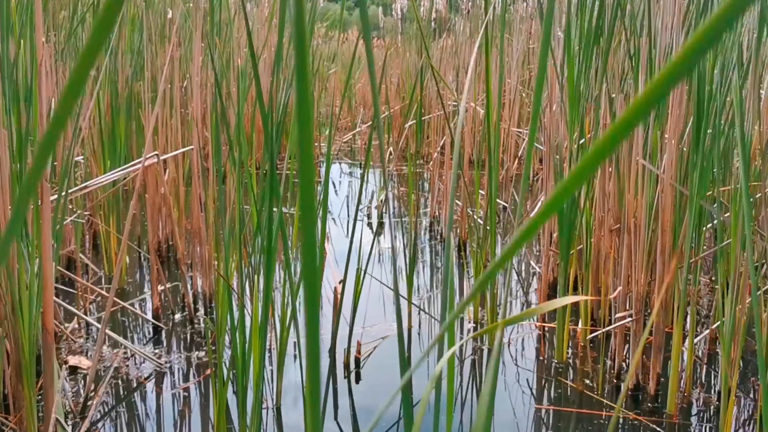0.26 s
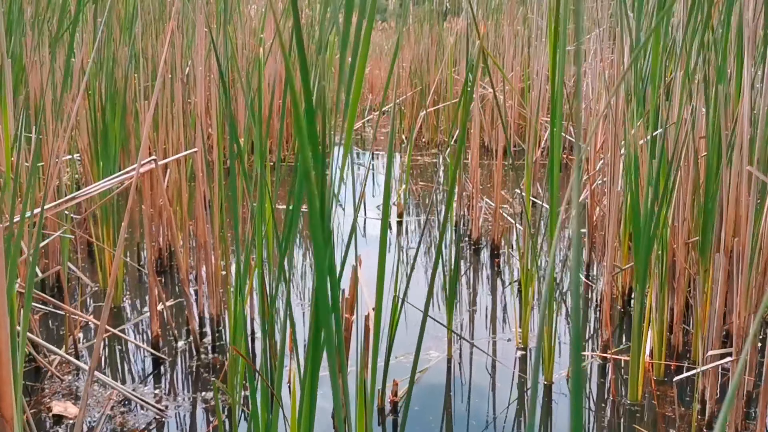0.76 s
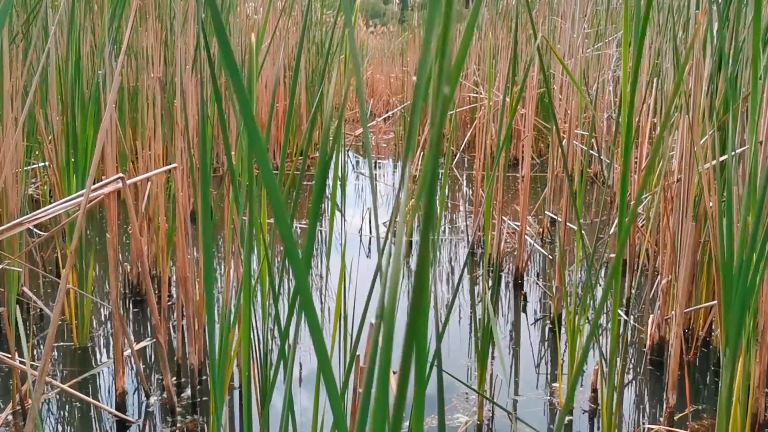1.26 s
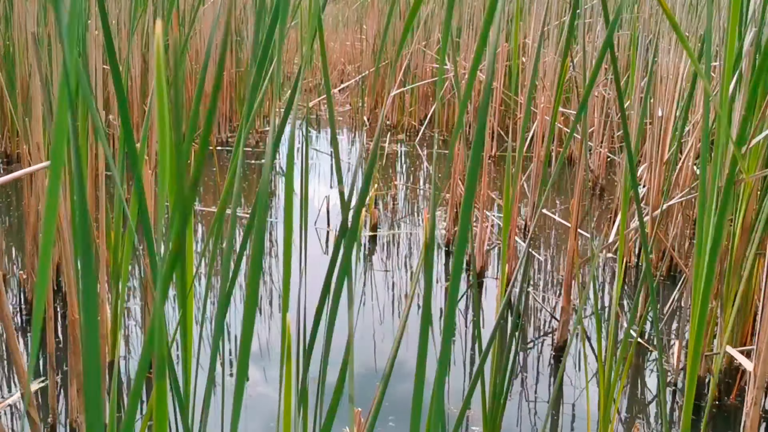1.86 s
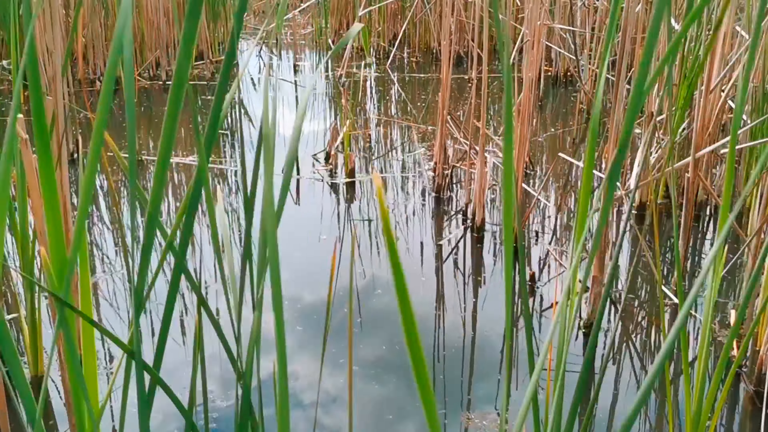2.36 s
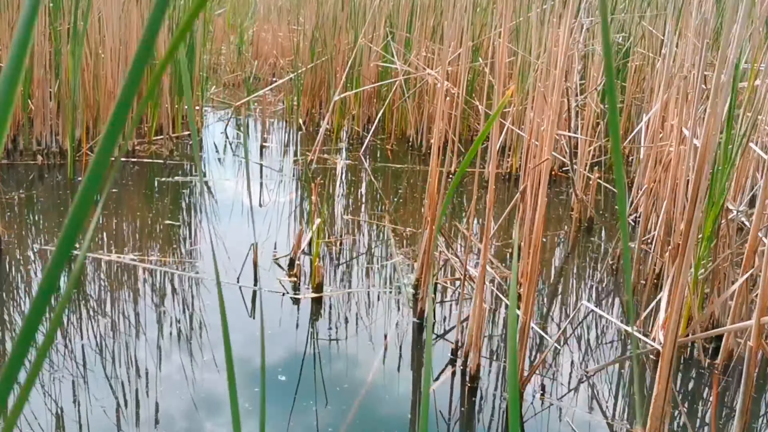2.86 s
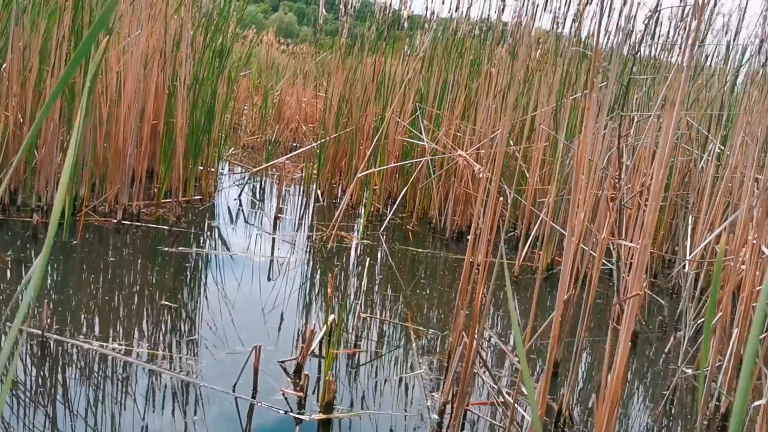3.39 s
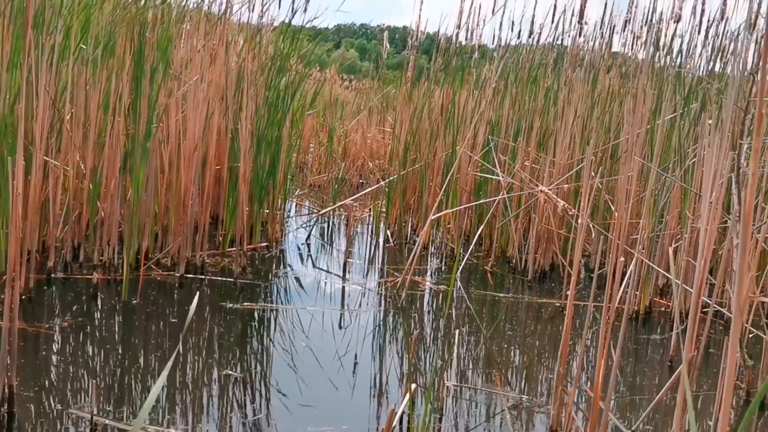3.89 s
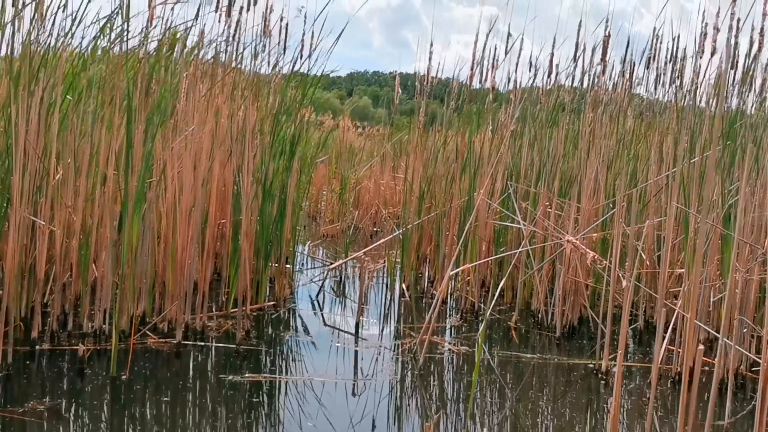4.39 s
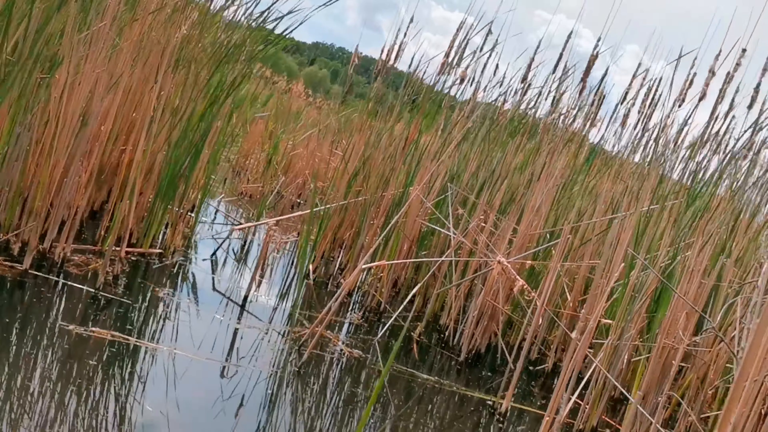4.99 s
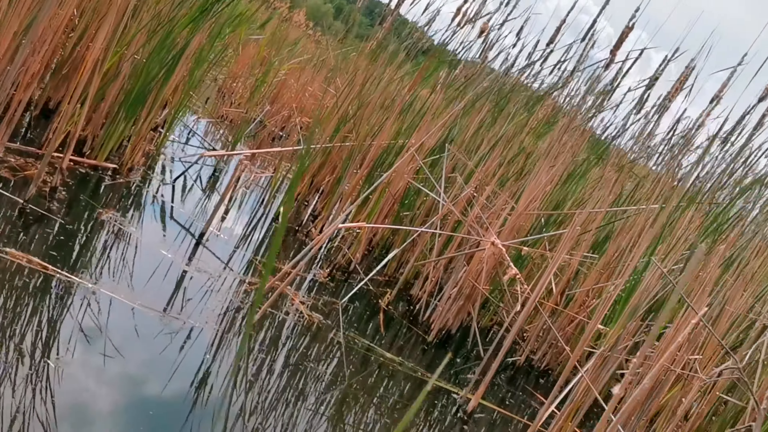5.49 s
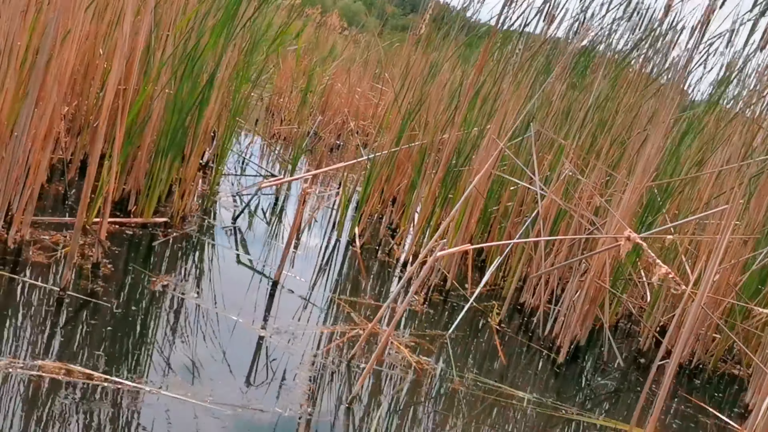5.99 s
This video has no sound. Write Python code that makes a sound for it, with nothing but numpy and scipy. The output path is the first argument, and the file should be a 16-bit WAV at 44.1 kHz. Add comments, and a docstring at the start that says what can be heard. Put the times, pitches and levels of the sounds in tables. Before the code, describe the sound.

Close, crisp rustling and snapping of reed blades, busiest at first, thinning midway, swelling again, then ending in bubbling water.

```python
"""A small camera is pushed through reeds standing in still water. From the start leaves scrape its case, mostly on
the right, as filtered noise in tiny catches, over a far reedy hiss, a bubbly wash, stem thuds and wind rumble.
Soon blades flick in enveloped leaf noise, stems tap as decaying sines, wet blades squeak as gliding breathy tones,
and one stem jerks along the case in low sines. Near the end the water gurgles with ringing, pitch-gliding bubbles.
The left microphone port hears the treble duller; the right one has cavity resonances."""
import sys
import numpy as np
from scipy import signal
from scipy.fft import rfft, irfft, next_fast_len
from scipy.io import wavfile
from scipy.ndimage import uniform_filter1d, map_coordinates

SR = 44100
rng = np.random.default_rng(int(sys.argv[2]) if len(sys.argv) > 2 else 0)


def transcribe(u):
    """Save the signal u as a 16-bit wav file named by the first command-line argument.

    u: samples, shape (n,) or (channels, n), limited to [-1, 1]; the rate is SR.
    q: integer samples, one column per channel.
    """
    v = np.clip(np.atleast_2d(u).T, -1, 1)
    q = np.round(v * 32767).astype(np.int16)
    wavfile.write(sys.argv[1], SR, q)


N = 275625


def amp(db):
    """Linear gain of a level in dB."""
    return 10 ** (np.asarray(db) / 20)


def unit(x):
    """Scale a signal to rms 1."""
    return x / np.sqrt(np.mean(x ** 2) + 1e-20)


def along(points, hz):
    """Read a curve of (Hz, value) points on a log frequency axis."""
    f, v = np.transpose(points)
    return np.interp(np.log(hz + 1), np.log(f + 1), v)


def curves(rows):
    """Draw one value per sample for each column after the time."""
    s, *columns = np.transpose(rows)
    return [np.interp(np.arange(N) / SR, s, column) for column in columns]


def wobble(rate):
    """A smooth random curve with rate knots a second."""
    knots = rng.standard_normal(int(N * rate / SR) + 4)
    return map_coordinates(knots, [np.arange(N) * rate / SR])


def filtered(x, response):
    """Shape the spectrum of x by a response of frequency in Hz."""
    m = next_fast_len(x.shape[-1] + SR // 2)
    return irfft(rfft(x, m) * response(np.fft.rfftfreq(m, 1 / SR)), m)[..., :N]


def noise(spectrum, alike, patchy_db=0):
    """Stereo noise of rms 1 in patches of random gain; alike is the share of power common to both ports."""
    z = signal.stft(rng.standard_normal((3, N)), nperseg=1024)[2]
    field = rng.standard_normal(z.shape[1:])
    field = uniform_filter1d(uniform_filter1d(field, 3, 0), 4, 1)  # smooth across frequency, then time
    white = signal.istft(z * amp(patchy_db * unit(field)), nperseg=1024)[1][:, :N]
    share = np.clip(alike, 0, 1)
    pair = np.sqrt(share) * white[0] + np.sqrt(1 - share) * white[1:]
    return unit(filtered(pair, lambda hz: amp(along(spectrum, hz))))


def sides(pan_db):
    """Left and right gains of constant power for a left-right difference in dB."""
    ratio = amp(pan_db)
    return np.array([ratio, np.ones_like(ratio)]) * np.sqrt(2 / (1 + ratio ** 2))


def swells(rows, rest_db):
    """Gain of rounded swells (middle s, length s, dB), added in power to a resting level."""
    t = np.arange(0, N, 32) / SR
    power = sum(amp(db) ** 2 * np.exp(-2 * np.abs(2 * (t - s) / length) ** 3) for s, length, db in rows)
    return np.sqrt(amp(rest_db) ** 2 + np.interp(np.arange(N) / SR, t, power))


# Colour of the papery leaf part. Each row: frequency in Hz, relative level in dB per Hz.
PAPERY_COLOUR = [(710, -27), (1200, -16), (1520, -16.5), (1620, -9.5), (1790, -14), (2220, -6.5),
                 (2900, -3), (3220, -7.5), (3600, -7), (3960, -5.5), (4360, -2.5), (5320, -0.5),
                 (9500, -3.5), (12400, -8), (20900, -120)]
# Colour of the thin bright leaf part. Each row: frequency in Hz, relative level in dB per Hz.
BRIGHT_COLOUR = [(4410, -25), (7500, -7), (8540, -5), (10900, -1), (13100, -0.5), (14100, -11), (15200, -4),
                 (16000, 0.5)]


def leaf_sound(low_gain, gain, patchy_db, crackle=1):
    """Leaf noise: a broad papery part and a thin bright part, the rest of the power, which crackles most."""
    low = np.clip(low_gain, 0, .97)
    papery = noise(PAPERY_COLOUR, 0, patchy_db) * unit(crackle ** .7)
    bright = noise(BRIGHT_COLOUR, 0, patchy_db) * unit(crackle)
    return gain * (low * papery + np.sqrt(1 - low ** 2) * bright)


# The continuous scrape of leaves. Each row: time in seconds, level in dB, papery part in dB re that level,
# left-right in dB.
SCRAPE_COURSE = [(0, -24.5, -6, -6), (.12, -32, -6, -7.5), (.3, -35, -8, -7.5), (.56, -37, -10, -7),
                 (.82, -37.5, -6.5, -7.5), (.92, -32, -8, -5.5), (1.2, -36, -6.5, -7.5),
                 (1.5, -36, -6.5, -4.5), (1.82, -44.5, -5, -3.5), (2.3, -44, -4.5, -1.5),
                 (2.7, -43, -5, -1.5), (3.4, -44.5, -5.5, -2), (3.67, -47, -4.5, -1),
                 (4.0, -38.5, -11, -2.5), (4.295, -43, -4.5, -2), (4.325, -33, -8, -2),
                 (4.6, -30, -4, -1.5), (4.95, -34, -4.5, -2), (5.23, -41.5, -3.5, -4.5), (5.5, -47, -3, -2),
                 (5.8, -49.5, -3, -2.5), (6.25, -47, -2.5, -2.5)]
# Single blades whisking past. Each row: middle in seconds, length in seconds, level in dB,
# papery part in dB re that level, left-right in dB.
BLADE_SWISHES = [(0.068, 0.042, -25.5, -7.5, -7), (0.181, 0.069, -26.5, -7, -8),
                 (.245, 0.058, -29.5, -4, -9), (0.408, .08, -40, -9, -8), (0.504, 0.077, -35, -7, -12),
                 (0.645, .07, -35, -10, -8), (0.888, 0.048, -37.5, -5.5, -8),
                 (1.143, 0.037, -34.5, -5.5, -5), (1.27, .06, -34, -7, -12), (1.43, 0.05, -32, -5, -7),
                 (1.672, 0.035, -34, -4.5, -3), (1.74, 0.044, -45, -2, -2), (2.187, 0.045, -44, -4.5, -2),
                 (2.43, .05, -39, -6, -3), (2.51, 0.055, -38, -9.5, 1), (2.707, 0.084, -39.5, -5.5, -1),
                 (2.795, 0.045, -35.5, -8, 1), (2.929, 0.063, -39, -6, 0), (3, 0.069, -42, -4, -2),
                 (3.095, 0.031, -46, -7, -2), (3.172, 0.057, -41.5, -7.5, -2), (3.294, 0.1, -38, -9.5, -2),
                 (3.343, 0.027, -33.5, -9.5, -3), (3.56, 0.14, -43.5, -8.5, -2),
                 (3.773, 0.12, -37, -11, -2), (4.11, 0.064, -37.5, -10, -3), (5.0, 0.054, -33, -6, -4),
                 (5.092, 0.082, -31.5, -10, -4), (5.158, .05, -35, -4, -3), (5.31, .085, -33, -6, -7),
                 (5.384, 0.088, -35.5, -7, -3), (5.61, 0.084, -43, -4.5, -3), (5.667, 0.039, -41, -4, -2),
                 (5.977, 0.15, -46.5, -2.5, -5), (6.156, 0.028, -40, -2, -1)]


def leaves():
    """Blades stick and slip over the case: a hiss of many tiny catches, single blades whisking through it."""
    level_db, low_db, pan_db = curves(SCRAPE_COURSE)
    low_rows = [(s, length, db + part_db) for s, length, db, part_db, _ in BLADE_SWISHES]
    left_rows = [(s, length, db + side_db) for s, length, db, _, side_db in BLADE_SWISHES]
    gain = swells([row[:3] for row in BLADE_SWISHES], level_db)
    low = swells(low_rows, level_db + low_db) / gain
    left = swells(left_rows, level_db + pan_db) / gain
    catches_per_s, catch_t60 = 450, 0.002  # t60 in s
    catches = (rng.random(N) < catches_per_s / SR) * amp(4 * rng.exponential(size=N).clip(0, 2.6))
    die = amp(-60 * np.arange(SR // 20) / SR / catch_t60)
    flutter_db = 1.3 * wobble(45)
    grain = 1.3 + signal.fftconvolve(catches, die)[:N]  # catches over a steady hiss
    return leaf_sound(low, gain * amp(flutter_db) * sides(20 * np.log10(left)), 2.4, grain)


# Colour of the far rustle. Each row: frequency in Hz, relative level in dB per Hz.
MARSH_COLOUR = [(120, -34), (200, -20.5), (245, 3.5), (373, -8), (800, -1.5), (1530, -3.5), (2210, 0),
                (3020, -16), (10900, -21), (16000, 9.5)]


def marsh():
    """Reeds farther off: a fine hiss that flickers with countless small ticks."""
    ticks_per_s, tick_t60 = 90, 0.011  # t60 in s
    ticks = (rng.random((2, N)) < ticks_per_s / SR) * amp(4.4 * rng.exponential(size=(2, N)).clip(0, 2.6))
    die = amp(-60 * np.arange(SR // 20) / SR / tick_t60)
    flicker_db = 1.9 * wobble(25)
    grain = unit(5.7 + signal.fftconvolve(ticks, die[None], axes=1)[:, :N])
    return amp(-46.5 + flicker_db) * grain * noise(MARSH_COLOUR, alike=0.092, patchy_db=2.0)


def bubble(hz, t60, glide):
    """An air pocket rings; its pitch glides as it rises or is squeezed."""
    t = np.arange(round(t60 * SR)) / SR
    tone = np.sin(2 * np.pi * hz * t * (1 + glide * t / (2 * t60)))
    return tone * amp(-60 * t / t60) * (1 - np.exp(-t / 0.0018))


# Course of the wash. Each row: time in seconds, level in dB.
WASH_COURSE = [(0.0, -46), (0.57, -56), (0.92, -57.5), (1.34, -52.5), (1.88, -57.5), (2.3, -52.5),
               (3.48, -59.5), (3.9, -54.5), (4.7, -61), (5.26, -50), (5.79, -50), (6.0, -44), (6.15, -41),
               (6.25, -43)]
# Colour of the wash noise. Each row: frequency in Hz, relative level in dB per Hz.
WASH_COLOUR = [(150, -41), (250, -9), (479, 2), (660, 4), (917, -7.5), (1160, -0.5), (1620, 0), (2240, 3),
               (4000, -11.5), (5200, -30), (8800, -120)]
# Bubbles that stand out. Each row: start in seconds, level in dB, pitch in Hz, t60 in seconds,
# left-right in dB, pitch glide as a share over the t60.
LARGE_BUBBLES = [(0.059, -29, 328, 0.026, -2, .4), (0.259, -37, 710, 0.059, -4, 0.24),
                 (1.141, -33, 725, 0.028, -3, 0.24), (1.25, -40, 1170, 0.039, -4.0, .4),
                 (1.482, -41.5, 1270, 0.051, -3.0, .4), (1.669, -41.5, 898, 0.06, -3, .4),
                 (2.167, -43.5, 490, 0.094, -2.0, .3), (3.743, -39, 640, 0.049, 7, 0.17),
                 (4.893, -39.5, 1150, 0.047, -5.5, 0.23), (5.672, -39, 1250, 0.058, -10, .4),
                 (5.739, -40, 610, 0.05, -5, .4), (5.871, -32, 1500, 0.03, -7, .1),
                 (5.872, -32, 596, 0.098, -1, 0.067), (5.899, -36.5, 580, 0.085, -2, .2),
                 (5.903, -36, 1130, 0.04, -6, .4), (5.928, -39, 1490, 0.05, -10, .1),
                 (5.944, -38.5, 520, 0.097, 1, -.1), (5.95, -36, 1300, 0.05, -8, 0.3),
                 (5.967, -38.5, 460, 0.15, 1, -0.11), (6, -34, 272, 0.085, 2, .8),
                 (6.008, -35, 2400, 0.044, -8, .2), (6.028, -34.5, 430, 0.069, 0, .4),
                 (6.049, -38, 500, 0.09, 0, 0.39), (6.053, -37, 2330, .05, -8, -.1),
                 (6.073, -33, 2290, 0.033, -9, -.1), (6.074, -27.5, 450, 0.042, 0, .9),
                 (6.097, -37, 597, 0.076, -1, 0.22), (6.104, -35, 2330, 0.03, -6, .1),
                 (6.115, -26, 590, 0.038, -2.5, -0.53), (6.127, -31.5, 1120, 0.05, -3, .4),
                 (6.129, -24, 440, 0.028, 1, -.3), (6.14, -36, 2000, .03, -7, .2),
                 (6.172, -32.5, 704, 0.044, -2, 0.018), (6.172, -27.5, 448, 0.034, 2, .3),
                 (6.194, -33.5, 440, 0.057, 1, -.1), (6.199, -39, 2150, 0.03, -8, .1)]
WATER_LEAD_S, LEAD_FROM_HZ = .00045, 640  # the upper part of the wash reaches the left port first
WATER_PAN_DB = -0.6  # left-right


def water():
    """A soft wash strewn with small bubbles, and the larger ones that stand out."""
    (level_db,) = curves(WASH_COURSE)
    small, large = np.zeros((2, 2, N + SR))
    for when, pitch, size, side in rng.random((1300, 4)):
        hz = 800 * 3.7 ** pitch
        ring = bubble(hz, 20 / hz, glide=0.48) * amp(8.8 * size + 5 * pitch)
        left, right = sides(12 * side - 8)
        start = round(when * N)
        small[0, start + round(30 * side):][:len(ring)] += ring * left  # delays in samples set the ports apart
        small[1, start + 15:][:len(ring)] += ring * right
    for s, db, hz, t60, pan_db, glide in LARGE_BUBBLES:
        ring = amp(db) * bubble(hz, t60, glide)
        large[:, round(s * SR):][:, :len(ring)] += ring * sides(pan_db)[:, None]
    wash = noise(WASH_COLOUR, alike=0.51, patchy_db=3.5) + 0.55 * unit(small[:, :N])
    lag_s = WATER_LEAD_S * np.arange(2)[:, None]  # none on the left
    wash = filtered(wash, lambda hz: np.exp(-2j * np.pi * (hz - LEAD_FROM_HZ).clip(0) * lag_s))
    return amp(level_db) * unit(wash) * sides(WATER_PAN_DB)[:, None] + large[:, :N]


# Stems leaning on the case. Each row: middle in seconds, length in seconds, thud level in dB,
# drag in dB re the thud.
STEM_LEANS = [(.04, .12, -52, -6.5), (0.227, 0.12, -44, -8.5), (0.444, 0.15, -50, -10.5),
              (.84, 0.22, -52.5, -8.5), (1.136, 0.21, -52, -7), (1.447, 0.15, -50.5, -5.5),
              (1.61, 0.15, -48, -6.5), (1.94, 0.16, -53.5, -7), (2.29, 0.55, -53, -6),
              (2.96, 0.15, -59, -6), (3.412, 0.091, -58.5, -7), (4.047, 0.25, -54, 0),
              (4.375, 0.19, -54, -12), (4.917, 0.083, -52.5, -11), (5.27, 0.17, -47.5, -4),
              (5.467, 0.16, -45.5, -10), (5.73, 0.2, -47.5, -5.5), (5.945, 0.26, -48, -10.5),
              (6.12, 0.16, -54, 2)]
# Wind on the ports. Each row: middle in seconds, length in seconds, level in dB.
WIND_GUSTS = [(.02, .1, -42), (.14, 0.18, -47.5), (.38, 0.073, -40), (.56, .2, -48.5), (1.01, 0.12, -45),
              (1.17, .1, -50), (1.58, 0.15, -47), (1.94, .12, -43), (2.31, 0.29, -46), (2.9, .25, -55),
              (3.25, 0.21, -50.5), (3.41, 0.065, -46), (3.55, 0.19, -50.5), (5.49, 0.093, -54),
              (5.72, 0.24, -53), (6.02, .14, -47.5), (6.16, .16, -53)]
# Colours of stem thud, stem drag and wind. Each row: frequency in Hz, relative level in dB per Hz.
THUD_COLOUR = [(55, -40), (80, -3.5), (110, 0), (165, -0.5), (210, -11), (300, -37)]
DRAG_COLOUR = [(150, -39), (200, 1.5), (260, -1), (340, -7), (450, -13), (700, -35)]
WIND_COLOUR = [(10, -36), (20, -2), (40, -0.5), (70, -4.5), (110, -18), (200, -57)]
STEM_REST_DB, DRAG_REST_DB, CALM_DB = -61.5, -64.5, -60  # between stems and between gusts
WIND_PAN_DB = -1.5  # left-right


def bumps():
    """Stems thud and drag through the case nearly alike on both ports; wind buffets each mostly on its own."""
    thud = swells([row[:3] for row in STEM_LEANS], STEM_REST_DB)
    drag = swells([(s, length, db + drag_db) for s, length, db, drag_db in STEM_LEANS], DRAG_REST_DB)
    thuds = thud * amp(0.68 * wobble(25)) * noise(THUD_COLOUR, alike=0.99, patchy_db=2.5)
    drags = drag * noise(DRAG_COLOUR, alike=0.91, patchy_db=2.5)
    wind = swells(WIND_GUSTS, CALM_DB) * noise(WIND_COLOUR, alike=0.13) * sides(WIND_PAN_DB)[:, None]
    return thuds + drags + wind


# Blades springing off the case. Each row: release in seconds, level in dB, papery part in dB re the whole,
# left-right in dB, snap in dB re the level.
BLADE_FLICKS = [(0.0698, -7.5, -15.5, -4, -7), (0.2787, -10.5, -8.5, -5, -4), (0.314, -11.5, -32, -7, -4),
                (0.5166, -11, -14.5, -2, -4), (0.6204, -18.5, -9, -9, -12), (0.6774, -17.5, -12, -7, -2),
                (0.7555, -14.5, -6.5, -9, -6), (0.8644, -13.5, -12, -9, -7), (0.8745, -21, -8, -9, -8),
                (1.1657, -17, -20, -6, -2), (1.263, -20, -8, -19, -8), (1.277, -22, -10, -9, -6),
                (1.2968, -19.5, -3, -5, -0.5), (1.4047, -12.5, -12, -3, -9), (1.6435, -24, -1, -1, -10),
                (1.6811, -13, -10, 0, -1), (1.7814, -31, -6, -5.5, -1), (1.8041, -17.5, -8.5, -3, 0),
                (2.016, -25, -9, -7, -3), (2.1707, -29.5, -6, 1, -10), (2.3982, -23.5, -8, -5, -2),
                (2.5556, -29, 0, 11, 5.5), (2.6928, -26, -4.5, 7, -7), (2.765, -24, -19, 3, -2),
                (3.2281, -26, -16, 4, -2.5), (3.432, -30, -2, -2, -6), (3.579, -26.5, -6, 0, -12),
                (3.732, -26.5, -10, -5, -6), (3.7599, -20.5, -15, -1, -9), (3.898, -15.5, -15, -1, -9),
                (4.103, -22, -9, -3, -3), (4.145, -17.5, -25, 3, -4), (4.1679, -17, -21, 0, -4),
                (4.2178, -27, -14, 6, 0), (4.2558, -20, -27, 1, -2), (4.273, -19.5, -23, 5, -2),
                (4.306, -24, -9, 3, -10), (4.4445, -22.5, -4.5, 3, -12), (4.9674, -14, -10, -1, -8),
                (4.992, -21, -1, -4, -6), (5.073, -25, -11, -6, -6), (5.0968, -22, -20, -3, 2),
                (5.146, -19.5, -4, 3, -15), (5.254, -21.5, 0, -13.5, -4), (5.275, -19.5, -0.5, -2, -3),
                (5.328, -15, -5, -2, -3), (5.347, -22, -6, -4, -6), (5.3962, -29, -1, -8, -8),
                (5.402, -28, 0, -8, -3), (5.4266, -16, -4, -4, -3), (5.5115, -28.5, -5, -4, -7),
                (5.567, -21, -10.5, 2, -5), (5.654, -27, -6, 2, -12), (6.1408, -28, -2, 2, -6)]
SHIVER_S, SHIVER_S_PER_DB = 0.014, .0006  # t60 of a flick with a 0 dB snap; a softer snap shivers longer


def flicks():
    """A bent blade strains, lets go with a snap and shivers on for a moment."""
    size, low, t = np.zeros((2, N + SR)), np.zeros(N + SR), np.arange(SR // 8) / SR
    strain = 0.0025  # s of creak before the release
    for s, db, low_db, pan_db, snap_db in BLADE_FLICKS:
        t60 = SHIVER_S - SHIVER_S_PER_DB * snap_db
        start = max(round((s - strain) * SR), 0)
        after = np.clip(t - strain, 0, None)
        fall = amp(-60 * after / t60) + 0.26 * amp(-60 * after / (3.6 * t60))
        shiver = fall * (1 - np.exp(-after / 0.003))
        snap = amp(snap_db - 60 * np.abs(after - .0012) / 0.0026)
        burst = amp(db) * np.where(t < strain, 0.19 * t / strain, shiver + snap)
        size[:, start:start + len(t)] += burst * sides(pan_db)[:, None]
        low[start:] = amp(low_db)
    ragged = amp(1.1 * wobble(1500))  # the blade chatters as it springs back
    return leaf_sound(low[:N], size[:, :N] * unit(ragged), patchy_db=1.5)


# Stems tapping the case. Each row: start in seconds, level in dB, pitch in Hz, t60 in seconds, left-right in dB.
STEM_KNOCKS = [(0.259, -20.5, 2270, 0.021, -22), (1.244, -29.5, 2200, 0.031, -19),
               (1.79, -33.5, 736, 0.02, 3), (2.382, -23, 500, 0.02, 3), (4.893, -26.5, 2140, 0.024, -16)]


def knocks():
    """Hollow stems tap the case: a note and a weaker second one above it, gone within hundredths of a second."""
    out, t = np.zeros((2, N + SR)), np.arange(SR // 10) / SR
    for s, db, hz, t60, pan_db in STEM_KNOCKS:
        notes = np.sin(2 * np.pi * hz * t) + 0.36 * np.sin(2 * np.pi * 1.75 * hz * t)
        fibres = unit(uniform_filter1d(rng.standard_normal(len(t)), size=40))
        notes = notes * (.7 + .8 * fibres)  # dry fibres roughen the ring
        tap = amp(db - 60 * t / t60) * notes * (1 - np.exp(-t / 0.0019))
        out[:, round(s * SR):][:, :len(t)] += tap * sides(pan_db)[:, None]
    return out[:, :N]


# Wet blades squeaking. Each row: start in seconds, end in seconds, first pitch in Hz, last pitch in Hz,
# width of the breath in Hz, level in dB.
BLADE_SQUEAKS = [(0.358, 0.666, 2290, 2424, 110, -58.5), (0.693, 0.774, 2390, 2410, 100, -52),
                 (0.882, 0.991, 2490, 2610, 130, -51), (1.234, 1.297, 2450, 2720, 150, -47.5),
                 (1.422, 1.49, 2590, 2640, 35, -45), (1.48, 1.555, 2680, 2860, 70, -52),
                 (1.659, 1.805, 2660, 2790, 60, -48.5), (2.021, 2.081, 2650, 2730, 40, -47),
                 (2.07, 2.155, 2790, 2860, 80, -48.5), (2.139, 2.252, 2780, 2720, 200, -50),
                 (2.575, 2.641, 3060, 2920, 170, -52), (2.785, 2.872, 3010, 2880, 75, -49.5),
                 (2.99, 3.084, 2910, 2760, 130, -50)]
CLEAR_HZ = 35  # a squeak this wide is half whistle, half breath


def squeaks():
    """A wet blade drags along the case: a breathy whistle glides and settles as the free length changes."""
    out, drag = np.zeros((2, N)), wobble(60)
    for start, end, from_hz, to_hz, width_hz, db in BLADE_SQUEAKS:
        t = np.arange(round((end - start) * SR)) / SR
        here = drag[round(start * SR):][:len(t)]
        breath = filtered(rng.standard_normal((2, 2, len(t))), lambda hz: 1 / (1 + (hz / width_hz) ** 2))
        a, b = unit(breath[..., :len(t)])
        settle = 1 - (1 - t / t[-1]) ** 2
        pitch_hz = from_hz + (to_hz - from_hz) * settle + 0.25 * width_hz * here
        turn = 2 * np.pi * np.cumsum(pitch_hz) / SR
        edges = np.sin(np.pi / 2 * np.clip(np.minimum(t / 0.012, (t[-1] - t) / 0.015), 0, 1))
        whistle = (a + np.sqrt(2) * CLEAR_HZ / width_hz) * np.cos(turn) + b * np.sin(turn)
        out[:, round(start * SR):][:, :len(t)] += amp(db + 0.8 * here) * edges * unit(whistle)
    return out * sides(-5.0)[:, None]


# A bent stem jerking along the case. Each row: start in seconds, level in dB, pitch in Hz.
STEM_JERKS = [(.363, -35, 80), (.389, -35, 105), (.403, -37, 135), (.428, -35, 150), (.444, -40, 130),
              (.459, -30, 150), (.481, -36, 150), (.499, -32, 185)]
THUMP_CYCLES = 9  # t60 in cycles


def thumps():
    """Each jerk of the bent stem swings the case for a few cycles, mostly higher as the stem tightens."""
    out, t = np.zeros(N), np.arange(SR // 8) / SR
    for s, db, hz in STEM_JERKS:
        fall = amp(db - 60 * t * hz / THUMP_CYCLES)
        swing = fall * np.sin(2 * np.pi * hz * t) * 2 * (1 - np.exp(-3 * t * hz))
        out[round(s * SR):][:len(t)] += swing
    return out


def scene():
    """All layers sound together at the two ports."""
    return leaves() + marsh() + water() + bumps() + flicks() + knocks() + squeaks() + thumps()


# Cavity colour of each microphone port. Each row: frequency in Hz, gain in dB.
LEFT_CAVITY = [(100, 1.5), (400, 1.15), (1000, -3), (6000, -1), (9000, -1), (12000, -8.5), (15500, -4)]
RIGHT_CAVITY = [(100, -3.5), (500, 1.5), (5800, 0.62), (6900, 1.5), (7800, -4.5), (9500, -1.5), (10800, 4),
                (12500, -1.5), (14000, 5.5), (15300, -3.5)]
TOP_HZ = 15900  # band limit


def record(dry):
    """Each port has its own cavity colour; nothing passes above the band limit."""
    def ports(hz):
        """Gain of the left and right port, cut at the band limit."""
        return amp([along(LEFT_CAVITY, hz), along(RIGHT_CAVITY, hz)]) * (hz < TOP_HZ)
    return filtered(dry, ports)


dry = scene()
out = record(dry)
transcribe(out)
```